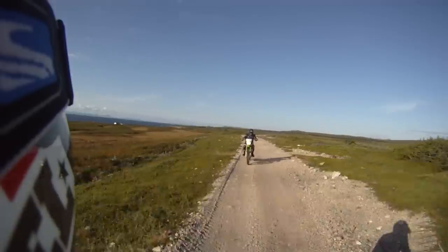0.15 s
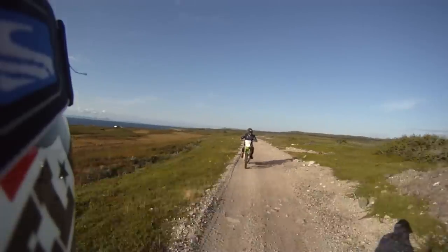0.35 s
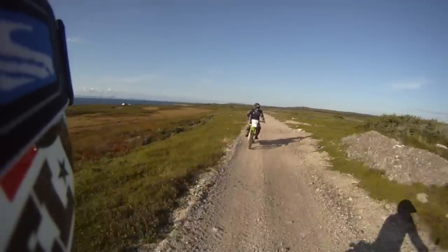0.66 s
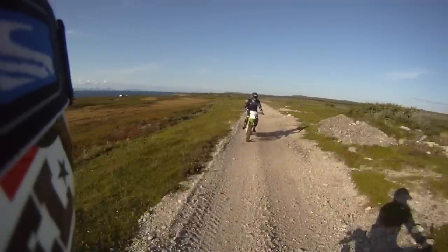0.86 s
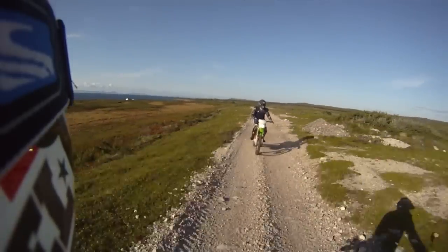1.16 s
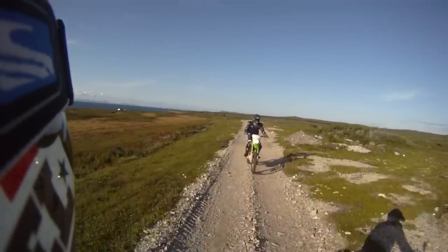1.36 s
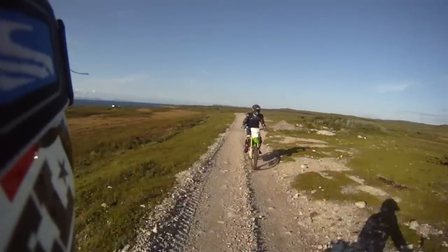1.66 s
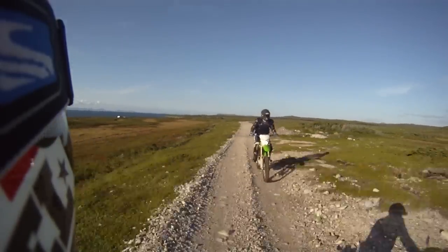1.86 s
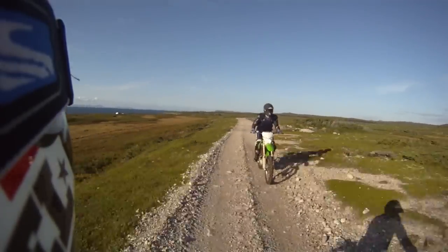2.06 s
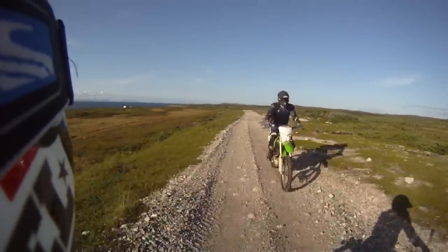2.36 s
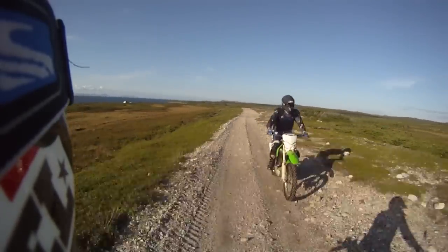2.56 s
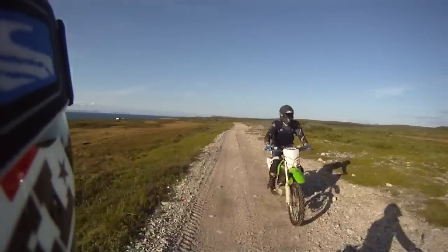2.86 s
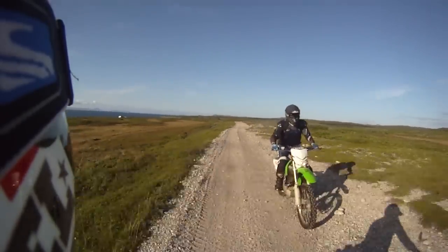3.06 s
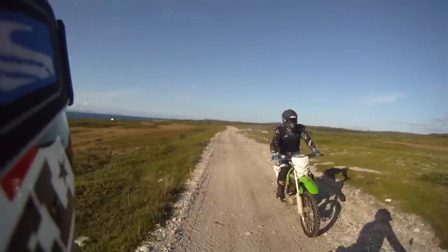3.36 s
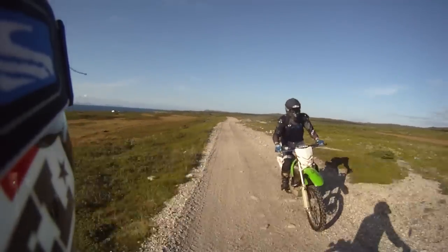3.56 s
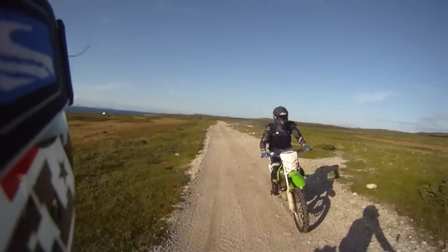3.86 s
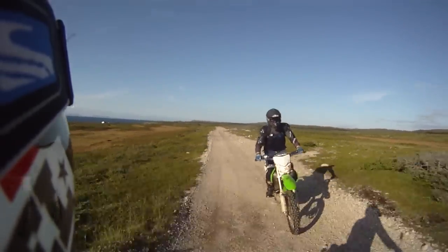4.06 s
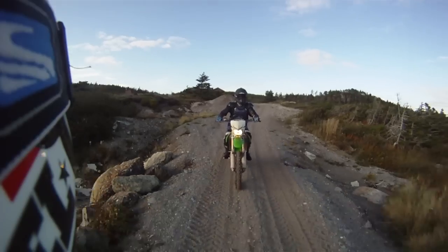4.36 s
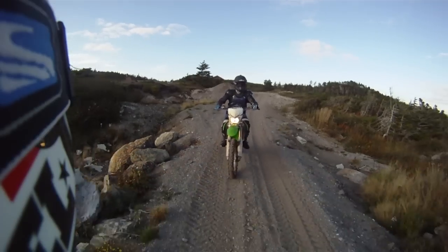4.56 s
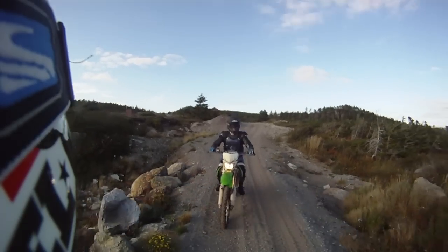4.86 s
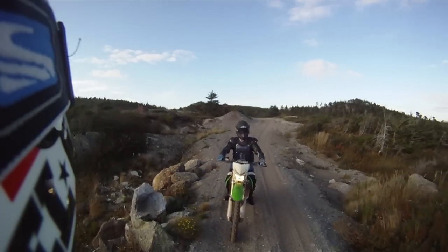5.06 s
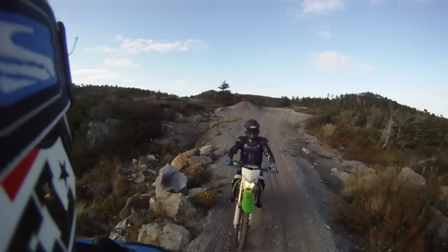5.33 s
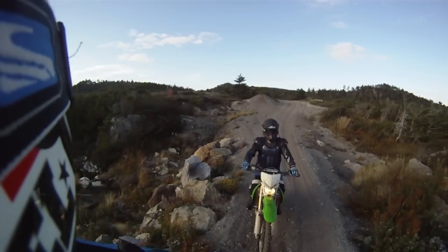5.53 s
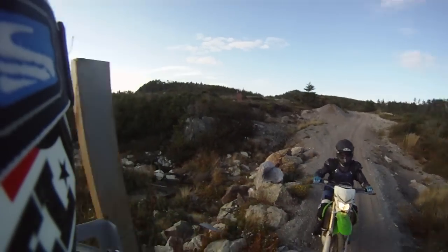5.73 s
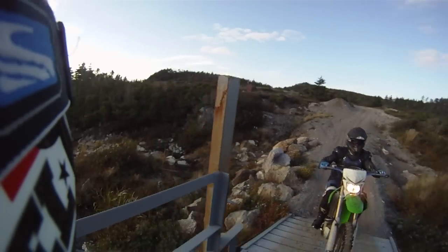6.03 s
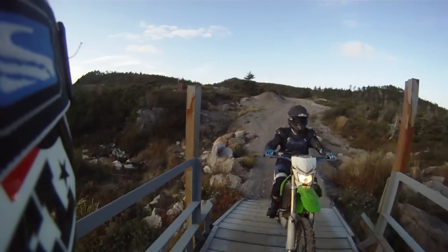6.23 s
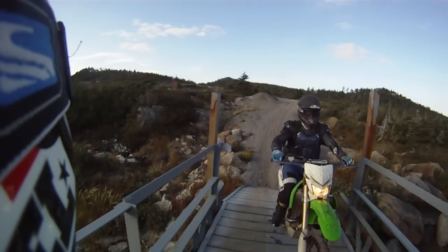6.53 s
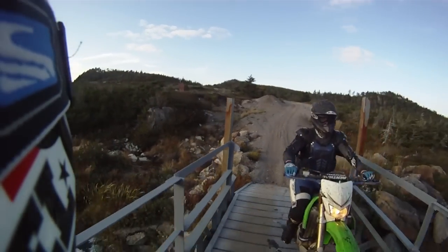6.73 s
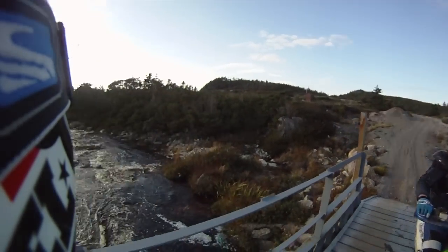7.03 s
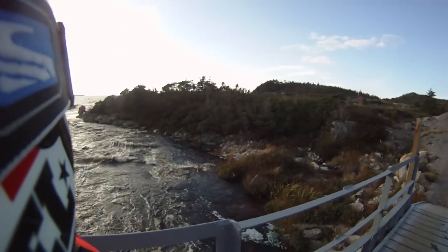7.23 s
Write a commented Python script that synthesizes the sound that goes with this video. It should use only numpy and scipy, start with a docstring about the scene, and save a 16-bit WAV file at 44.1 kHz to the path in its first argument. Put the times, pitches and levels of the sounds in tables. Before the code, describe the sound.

From the start, wind rushes and buffets a helmet microphone in low gusts, nearly hiding the steady drone of a cruising dirt bike. Gravel roars under the tyres around 0.7 to 1.5 seconds and again from 2.4 to 3. A second bike hums up close near 3 seconds, then everything fades to silence at about 4.2. A slow ride fades in: a single-cylinder engine thumps over crunching grit, dropping to low revs around 5 seconds. From about 5.6 seconds the chain clicks and jolts rattle the bikes as they reach a plank bridge, with small metal clinks and the sharpest knocks near 6.1 and 6.6 seconds. The revs pick up around 6 seconds with a hollow boom, and the engine barks on several short throttle blips from 6.3 until the end, near 7.4. The treble has a slight fizz throughout.

```python
"""Wind rushes and buffets over a small plastic camera on a dirt bike rider's helmet, nearly hiding
the engine's drone. The bike cruises along a gravel trail, and a second one hums up close behind.
The fast ride fades out and a slow ride fades in: a single-cylinder four-stroke thumps at low revs,
each firing a puff down the pipe, and barks on short blips of throttle. Jolts rattle the bikes as they
clatter onto a plank bridge. The camera's coarse sampling adds a fizzy treble."""
import sys
import numpy as np
from scipy import signal
from scipy.fft import rfft, irfft
from scipy.io import wavfile
from scipy.ndimage import uniform_filter1d

SR = 44100
rng = np.random.default_rng(int(sys.argv[2]) if len(sys.argv) > 2 else 0)


def file_out(sig):
    """Save sig as 16-bit WAV at sys.argv[1]."""
    # one column per channel
    cols = np.atleast_2d(sig).T
    # limit, then scale
    lim = np.clip(cols, -1, 1)
    pcm = np.round(lim * 32767).astype(np.int16)
    wavfile.write(sys.argv[1], SR, pcm)


N = 325898
TIME = np.arange(N) / SR
HZ = np.fft.rfftfreq(N, 1 / SR)
BRIDGE_RAMP_S = 5.64  # the bikes reach the rough ramp up to the bridge


def gain_of(db):
    """Decibels to gain."""
    return 10 ** (np.asarray(db) / 20)


def evened(x):
    """Scales to rms 1."""
    return x / np.sqrt(np.mean(x ** 2) + 1e-20)


def levelled(x):
    """Rides the gain to hold the rms near 1 over a few firings."""
    power = uniform_filter1d(uniform_filter1d(x ** 2, size=5000), size=5000)
    return x / np.sqrt(abs(power) + np.mean(x ** 2) / 1000)


def curve(rows):
    """A control curve at every sample."""
    return np.interp(TIME, *np.transpose(rows))


def after(start_s, rise_s):
    """Ramps from 0 to 1 around the given moment."""
    return np.clip((TIME - start_s) / rise_s + .5, 0, 1)


def held(events, rise_s, fall_s):
    """Each event ramps toward its value around its start and back to zero around its end."""
    return sum(value * np.clip(np.minimum((TIME - start) / rise_s, (end - TIME) / fall_s) + .5, 0, 1)
               for start, end, value in events)


def swelling(events, rise_s, fall_s):
    """The gain of a sound that swells from silence toward each event's level in dB."""
    return held([(start, end, gain_of(db)) for start, end, db in events], rise_s, fall_s)


def wobble(rate_hz):
    """Smooth random motion of rms 1, up to the given rate."""
    return evened(irfft(rfft(rng.standard_normal(N)) / (1 + (HZ / rate_hz) ** 4), N))


def spectrum(points):
    """An EQ curve in dB at every frequency."""
    hz, db = np.transpose(points)
    return np.interp(np.log(HZ + 1), np.log(hz + 1), db)


def lifted(modes):
    """The lift in dB that a set of resonances gives at every frequency."""
    return sum(db / (1 + (2 * (HZ - hz) / width) ** 2) for hz, width, db in modes)


def coloured(x, db):
    """Causal filter with the given gain: resonances ring after their cause."""
    log_gain = np.log(gain_of(db))
    phase = -signal.hilbert(np.r_[log_gain, log_gain[-2:0:-1]]).imag[:len(HZ)]
    return irfft(rfft(x) * np.exp(log_gain + 1j * phase), N)


def ring(x, modes):
    """Passes x through damped resonances."""
    t = np.arange(SR // 8) / SR
    response = sum(gain_of(db) * np.exp(-np.pi * width * t) * np.sin(2 * np.pi * hz * t)
                   for hz, width, db in modes)
    return signal.oaconvolve(x, response)[:N]


# The headwind's strength while cruising. Each row: time in seconds, level in dB.
HEADWIND = [(0, -18), (.35, -21.5), (.77, -19), (1.4, -21), (1.68, -22.5), (2.3, -23), (2.46, -20),
            (3.12, -20.5), (3.7, -24.5), (4.1, -24.5)]
# Air resonances in the camera case. Each row: frequency in Hz, width in Hz, lift in dB.
CASE_MODES = [(720, 163, 12), (1006, 120, 5), (1282, 99, 6), (1805, 110, 3), (2116, 234, 10.5),
              (2360, 205, 8), (3020, 67, 1), (3615, 340, 5)]
# The broad hiss of the air. Each row: frequency in Hz, relative level in dB.
RUSH_EQ = [(100, -18.5), (300, -1), (400, -1), (510, -2.5), (620, -2.5), (900, -0.5), (1500, 1),
           (2000, 0.5), (2700, -2), (3800, -4), (4250, -9), (5200, -10), (5700, -14.5), (6000, -27)]


def wind_rush(flutter_db=0.73, flutter_hz=25, crackle_db=1.0, crackle_hz=350):
    """Turbulent air tears at the case in quick irregular bursts."""
    bursts = gain_of(flutter_db * wobble(flutter_hz) + crackle_db * wobble(crackle_hz))
    air = coloured(bursts * rng.standard_normal(N), spectrum(RUSH_EQ) + lifted(CASE_MODES))
    return gain_of(curve(HEADWIND)) * evened(air)


# The bassy thud of the wind. Each row: frequency in Hz, relative level in dB.
BUFFET_EQ = [(25, -20), (55, -8.5), (85, 6.5), (130, 0.5), (190, -2), (270, -7), (360, -14), (700, -35),
             (2000, -42)]
# Gusts on the helmet. Each row: start and end in seconds, lift in dB.
GUSTS = [(.71, .8, 4.5), (1.13, 1.5, 4.5), (1.79, 1.9, 4.5), (2.2, 2.3, 1), (2.68, 2.97, 1.5)]


def buffeting(lumpy_db=0.4, lumpy_hz=9, level_db=-7.0):
    """Lumps of pressure beat on the helmet, following the headwind and harder in gusts."""
    lumps = gain_of(lumpy_db * wobble(lumpy_hz)) * coloured(rng.standard_normal(N), spectrum(BUFFET_EQ))
    gust_db = held(GUSTS, rise_s=0.033, fall_s=0.09)
    return gain_of(curve(HEADWIND) + gust_db + level_db) * evened(lumps)


# The sub-bass of the eddies. Each row: frequency in Hz, relative level in dB.
EDDY_EQ = [(10, -36), (24, -17.5), (33, -9), (38, 4.5), (46, -13), (70, -28), (200, -46), (600, -87)]
# Eddies build up behind the helmet. Each row: start and end in seconds, lift in dB.
EDDY_SWELLS = [(.07, .69, 7.5), (1.2, 1.5, 7.5), (1.79, 2.02, 7.5), (2.53, 3.0, 7), (3.25, 3.95, 5.5),
               (4.3, 4.72, 6), (4.97, 5.42, 9), (5.66, 6.02, 8.5)]


def eddies(level_db, waver_db=2.6, waver_hz=6):
    """Large eddies give a deep rumble that comes in swells."""
    swell_db = held(EDDY_SWELLS, rise_s=0.095, fall_s=0.13) + waver_db * wobble(waver_hz)
    rumble = coloured(rng.standard_normal(N), spectrum(EDDY_EQ))
    return gain_of(swell_db + level_db) * levelled(rumble)


# Stretches of coarse gravel. Each row: start and end in seconds, level in dB.
ROUGH_GROUND = [(-.1, .65, -36.5), (0.714, 1.48, -26.5), (1.55, 2.35, -38.5), (2.395, 3.018, -29.5)]
# Resonances of the gravel's roar. Each row: frequency in Hz, width in Hz, relative level in dB.
GRAVEL_MODES = [(758, 42, -11.5), (868, 160, -8.5), (1027, 180, -6)]


def gravel(grain_db=2.0, grain_hz=120):
    """Stones drum under the tyres in a hollow roar on the rough stretches."""
    stones = gain_of(grain_db * wobble(grain_hz)) * rng.standard_normal(N)
    return swelling(ROUGH_GROUND, rise_s=0.12, fall_s=0.19) * evened(ring(stones, GRAVEL_MODES))


# Revs while cruising. Each row: time in seconds, firings per second.
CRUISE_REVS = [(0, 47.6), (.7, 47), (1.2, 47.2), (1.7, 44.6), (2.2, 45.7), (2.6, 46), (3, 45.6), (4.1, 42)]
# The drone's harmonics. Each row: multiple of the firing rate, relative level in dB.
DRONE_HARMONICS = [(1, -0.5), (2, -1), (3, -1), (4, -3), (5, -2), (6, -1.5), (7, -9.5), (9, -9.5),
                   (11, -7.5)]


def exhaust_drone(waver=0.0037, flutter_db=2.5, level_db=-37, ease_off_s=2.93, eased_db=-4.0):
    """The exhaust drones at speed, shaken by the wind. Easing off thins the lowest four harmonics."""
    cycles = np.cumsum(curve(CRUISE_REVS) * (1 + waver * wobble(8.5))) / SR
    thinning_db = eased_db * after(ease_off_s, rise_s=0.36)
    tone = np.zeros(N)
    for multiple, db in DRONE_HARMONICS:
        gain = gain_of(db + thinning_db * (multiple < 5) + flutter_db * wobble(9.9))
        tone += gain * np.cos(2 * np.pi * (multiple * cycles + rng.random()))
    return np.sqrt(2) * gain_of(level_db) * tone


# The second bike draws up close. Each row: start and end in seconds, level in dB.
DRAW_UP = [(2.82, 3.42, -33.5)]


def second_bike(hum_hz=170, waver=0.026, flutter_db=3.0):
    """The second bike adds a wavering hum while it pulls closer."""
    cycles = np.cumsum(hum_hz * (1 + waver * wobble(10.4))) / SR
    hum = np.sqrt(2) * gain_of(flutter_db * wobble(17)) * np.cos(2 * np.pi * cycles)
    return swelling(DRAW_UP, rise_s=0.31, fall_s=0.3) * hum


# Revs on the slow ride. Each row: time in seconds, firings per second.
SLOW_REVS = [(4.18, 27.48), (4.4, 25.28), (4.65, 25.63), (4.8, 27.0), (4.95, 23.7), (5.08, 17.23),
             (5.22, 18.95), (5.45, 16.73), (5.62, 19.38), (5.85, 18.48), (6.05, 26.41), (6.22, 30.2),
             (6.4, 28.78), (6.52, 24.15), (6.72, 24.22), (6.88, 29.54), (7.12, 27.51), (7.39, 31.59)]


def engine_cycles():
    """Counts four-stroke cycles on the slow ride: one firing and two crank turns each."""
    running = TIME >= SLOW_REVS[0][0]
    return .6 + np.cumsum(curve(SLOW_REVS) * running) / SR


# The rider blips the throttle. Each row: start and end in seconds, opening from 0 to 1.
BLIPS = [(4.19, 4.92, 0.59), (5.55, 6.26, 0.33), (6.33, 6.47, 0.94), (6.74, 6.87, .95), (6.94, 7.03, 1),
         (7.11, 7.45, 1)]


def throttle():
    """How far the throttle is open, 0-1."""
    return np.clip(held(BLIPS, rise_s=0.056, fall_s=0.049), 0, 1)


# Exhaust pipe resonances. Each row: frequency in Hz, width in Hz, relative level in dB.
PIPE_MODES = [(105.6, 65, 5.5), (196, 50, -3.5)]
# Resonances that open with the throttle. Each row: frequency in Hz, width in Hz, relative level in dB.
BARK_MODES = [(201, 70, 5.5), (271, 110, 3.5), (459, 49, 2), (570, 41, -14)]
# The thump slackens for a few firings. Each row: start and end in seconds, dip in dB.
FALTERS = [(4.93, 5.11, -5.5), (6.14, 6.32, -4.5), (6.62, 6.74, -3)]


def exhaust(cycles, uneven_db=3.0, stumble_cycles=0.043, rasp=0.028, rasp_cycles=0.48, low_hz=72,
            thump_db=-36.0, thump_open_db=-11, bark_db=-54, bark_open_db=19,
            bark_delay_s=0.00325, echo_s=0.00469, echo_gain=1.7):
    """Each firing puffs down the pipe: an even bark under throttle, a stumbling, breathy thump without."""
    opening = throttle()
    slack = 1 - opening
    cycles = cycles + slack * stumble_cycles * wobble(8.4)
    firings = np.diff(np.floor(cycles), prepend=0) * gain_of(slack * uneven_db * wobble(34))
    gas = slack * rasp * np.exp(-(cycles % 1) / rasp_cycles) * rng.standard_normal(N)
    low_cut = HZ ** 4 / (HZ ** 4 + low_hz ** 4)  # a small pipe radiates little bass
    puffs = irfft(rfft(firings + gas) * low_cut, N)
    thump = levelled(ring(ring(puffs, PIPE_MODES), PIPE_MODES))  # header, then silencer
    direct = np.interp(TIME - bark_delay_s, TIME, puffs)
    echo = -echo_gain * np.interp(TIME - bark_delay_s - echo_s, TIME, puffs)  # the open end inverts it
    bark = levelled(ring(direct + echo, BARK_MODES))
    thinning_db = thump_open_db * opening ** 12  # wide open, the bark takes over
    thinning_db += held(FALTERS, rise_s=0.12, fall_s=0.061)
    return gain_of(thump_db + thinning_db) * thump + gain_of(bark_db + bark_open_db * opening) * bark


# The tone of a valve tick. Each row: frequency in Hz, relative level in dB.
TICK_EQ = [(100, 3), (600, -37), (1200, -32), (2200, -1), (3000, 8), (3700, -16), (4300, -17), (6000, -7)]


def valves(cycles, tick_cycles=0.092, lag_cycles=0.11, uneven_db=4, level_db=-60, open_db=13):
    """The valves tick softly with every firing, harder under throttle."""
    age = ((cycles - lag_cycles) % 1) / tick_cycles
    gate = age * np.exp(-age) * gain_of(uneven_db * wobble(22))
    ticks = coloured(gate * rng.standard_normal(N), spectrum(TICK_EQ) + lifted(CASE_MODES))
    return gain_of(level_db + open_db * throttle()) * levelled(ticks)


# The crunch of grit. Each row: frequency in Hz, relative level in dB.
GRIT_EQ = [(80, -12), (250, 10), (450, 3), (720, -4.5), (1100, 0), (1600, -1.5), (2200, -5), (2800, -3),
           (3600, -6), (4200, -11), (5300, -7), (6000, -21.5)]


def rolling(cycles, clatter=0.44, clatter_cycles=0.063, grain_db=2.0, grain_hz=300,
            level_db=-41.5, ramp_db=3):
    """Tyres crunch over grit, and the engine's metal clatters after each firing."""
    beat = 1 + clatter * np.exp(-((cycles - .1) % 1) / clatter_cycles)
    grains = beat * gain_of(grain_db * wobble(grain_hz)) * rng.standard_normal(N)
    crunch = evened(coloured(grains, spectrum(GRIT_EQ) + lifted(CASE_MODES)))
    return gain_of(level_db + ramp_db * after(BRIDGE_RAMP_S, rise_s=0.33)) * crunch


def rattle(events, eq, modes, rise_s, tail_db, tail_t60_s):
    """Each bump sets off a short dense rattle that rings the struck parts, with a weaker tail."""
    power = np.zeros(N)
    for start, db, t60 in events:
        age = np.maximum(TIME - start, 0)
        fall = gain_of(-60 * age / t60) + gain_of(tail_db - 60 * age / tail_t60_s)
        power += (gain_of(db) * (1 - np.exp(-age / rise_s)) * fall) ** 2
    colour_db = spectrum(eq) + lifted(modes) + lifted(CASE_MODES)
    sound = coloured(np.sqrt(power) * rng.standard_normal(N), colour_db)
    return sound / np.sqrt(np.mean(gain_of(colour_db) ** 2))


# Jolts to the bike. Each row: start in seconds, level in dB, seconds to fall 60 dB.
JOLTS = [(4.741, -36, .052), (4.843, -37, .1), (5.583, -32.5, 0.05), (5.676, -28, .05), (5.761, -30.5, .07),
         (6.005, -22.5, 0.052), (6.089, -16.5, 0.06), (6.134, -27.5, .09), (6.171, -28, .14),
         (6.41, -30.5, 0.14), (6.551, -26.5, .05), (6.603, -15, 0.075), (6.611, -30, .07),
         (6.77, -32, 0.033), (6.808, -28.5, .06), (6.8925, -21, 0.05), (6.914, -29, .07),
         (6.968, -28.5, 0.13), (7.017, -31, 0.11), (7.336, -27, .054)]
# The body of a knock. Each row: frequency in Hz, relative level in dB.
KNOCK_EQ = [(60, -16), (250, 2.5), (600, -3), (1000, -9), (1500, -7), (1850, 7.5), (2300, -9), (3000, -5),
            (4000, -20), (6000, -25)]
# The mudguard's ring. Each row: frequency in Hz, width in Hz, lift or cut in dB.
MUDGUARD_MODES = [(1256, 510, 13.5), (1580, 81, 4.5), (1750, 59, -18)]


def knocks():
    """Jolts rattle the bike and set the mudguard clacking."""
    return rattle(JOLTS, KNOCK_EQ, MUDGUARD_MODES, rise_s=0.0015, tail_db=-21.0, tail_t60_s=0.41)


# Hollow swells. Each row: centre and half length in seconds, pitch and width in Hz, level in dB.
HOLLOW_SWELLS = [(4.86, 0.065, 323, 50, -43), (4.96, 0.034, 1000, 50, -51), (5.637, 0.11, 173, 50.5, -42.5),
                 (6.125, 0.31, 176, 60, -39.5), (6.133, .06, 316, 60, -43.5), (6.818, 0.041, 259, 80, -35)]


def hollow_swells():
    """Short hollow swells: the second bike's engine rumbles low behind, with a few brief higher groans."""
    out = np.zeros(N)
    for centre, half_length, hz, width, db in HOLLOW_SWELLS:
        tone = irfft(rfft(rng.standard_normal(N)) / (1 + ((HZ - hz) / width * 2) ** 4), N)
        swell = np.exp(-((TIME - centre) / half_length) ** 2 / 2)
        out += gain_of(db) * swell * levelled(tone)
    return out


# The ring of chain and sprockets. Each row: frequency in Hz, width in Hz, relative level in dB.
CHAIN_MODES = [(3580, 57, 1.5), (1228, 30, 0), (2130, 330, 11)]


def chain(clicks_per_s=110, spread_db=5, hiss=0.04, spurt_db=1.5, spurt_hz=10, level_db=-43.5, open_db=3):
    """Loose links click over the sprockets in spurts near the bridge, louder when the throttle pulls."""
    hits = rng.random(N) < clicks_per_s / SR
    clicks = hits * gain_of(spread_db * np.clip(rng.standard_normal(N), -2, 2))
    links = ring(clicks + hiss * rng.standard_normal(N), CHAIN_MODES)
    pull_db = open_db * throttle() + spurt_db * wobble(spurt_hz)
    return after(BRIDGE_RAMP_S, rise_s=0.25) ** 2 * gain_of(level_db + pull_db) * levelled(links)


# Metal clinks. Each row: start in seconds, relative level in dB, seconds to fall 60 dB.
CLINKS = [(5.845, -32, 0.084), (6.319, -29, .035), (6.772, -28.5, .045), (6.812, -36, .05)]
# The bright tone of a clink. Each row: frequency in Hz, relative level in dB.
CLINK_EQ = [(60, -40), (1000, -10), (2500, 1), (6000, -8)]
# The ring of small metal parts. Each row: frequency in Hz, width in Hz, lift in dB.
METAL_MODES = [(2840, 220, 20), (3620, 150, 12), (4800, 500, 10), (5340, 340, 12)]


def clinks(level_db=-3):
    """Small metal parts clink on the bumps."""
    metal = rattle(CLINKS, CLINK_EQ, METAL_MODES, rise_s=.0005, tail_db=-23, tail_t60_s=.12)
    return gain_of(level_db) * metal


# Engine booms. Each row: start and end in seconds, level in dB.
BOOMS = [(6.0, 6.203, -45), (6.327, 6.7, -33.5), (6.92, 7.11, -37)]


def piston_boom(cycles, lag_cycles=0.292):
    """The piston's shake, twice a crank turn, sings out in swells and glides with the revs."""
    crank_turns = 2 * (cycles - lag_cycles)
    shake = -np.sqrt(2) * np.cos(2 * np.pi * 2 * crank_turns)
    return swelling(BOOMS, rise_s=0.065, fall_s=0.23) * shake


# Wheels drop onto loose planks. Each row: start in seconds, strength of the blow in dB.
PLANK_HITS = [(6.137, -37), (6.606, -30), (6.615, -27.5), (6.846, -40)]
# The ring of a plank and its bolts. Each row: frequency in Hz, width in Hz, gain in dB.
PLANK_MODES = [(616, 9.6, -1), (748, 28, 5.5), (1775, 30, 0), (2280, 16, 2.5)]


def planks():
    """Each drop of a wheel rings a loose plank."""
    blows = np.zeros(N)
    for start, db in PLANK_HITS:
        blows[round(start * SR)] += gain_of(db)
    return ring(blows, PLANK_MODES)


def scene(silence_at_s=4.17, fade_out_s=1.0, fade_in_s=0.93):
    """The fast ride fades to silence, and the slow ride fades in."""
    fade_out = np.clip((silence_at_s - TIME) / fade_out_s, 0, 1)
    fade_in = np.clip((TIME - silence_at_s) / fade_in_s, 0, 1)
    cycles = engine_cycles()
    bumps = knocks() + clinks() + planks()
    fast = wind_rush() + buffeting() + eddies(level_db=-34) + gravel() + exhaust_drone() + second_bike()
    engine = exhaust(cycles) + piston_boom(cycles) + valves(cycles)
    slow = engine + eddies(level_db=-43.5) + rolling(cycles) + chain() + hollow_swells() + bumps
    return (fade_out * fast + fade_in * slow)[None]


def record(dry, cutoff_hz=15200):
    """The camera samples at 12 kHz and holds each value, which mirrors the sound into a fizzy treble."""
    coarse = signal.resample_poly(dry, 40, 147, axis=1)
    stepped = np.repeat(coarse, 4, axis=1)  # held steps at 48 kHz
    fizzy = signal.resample_poly(stepped, 147, 160, axis=1)[:, :N]  # back to SR
    low_pass = signal.firwin(511, cutoff_hz, window=("kaiser", 9), fs=SR)
    return signal.oaconvolve(fizzy, low_pass[None], "same")


dry = scene()
out = record(dry)
file_out(out)
```